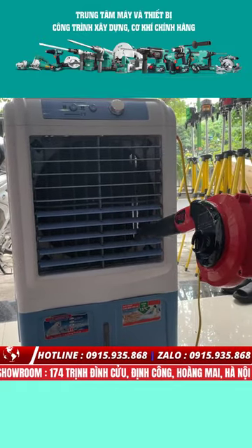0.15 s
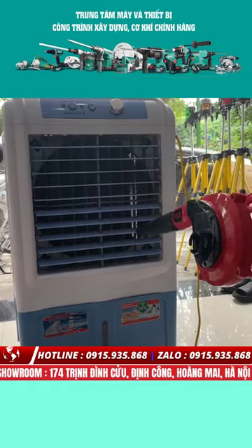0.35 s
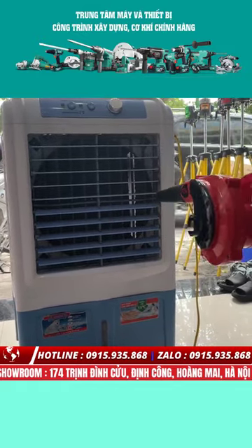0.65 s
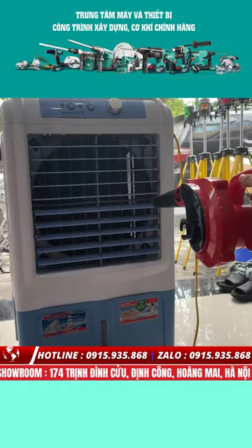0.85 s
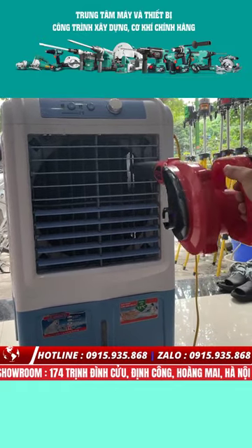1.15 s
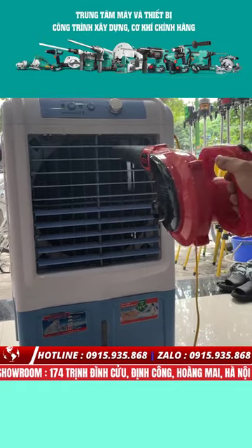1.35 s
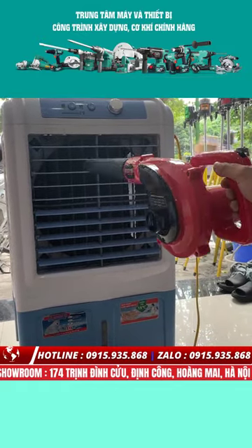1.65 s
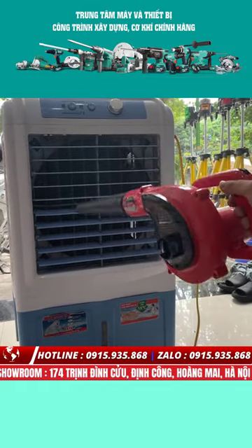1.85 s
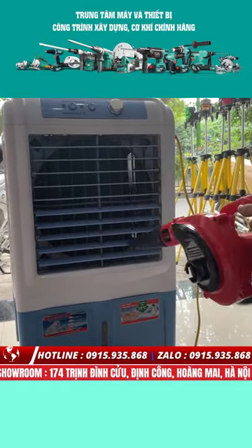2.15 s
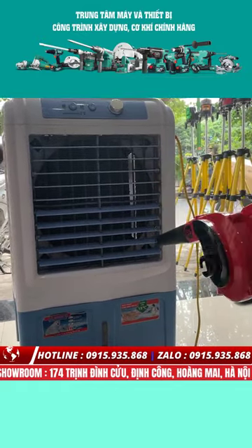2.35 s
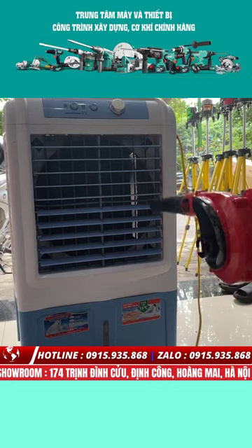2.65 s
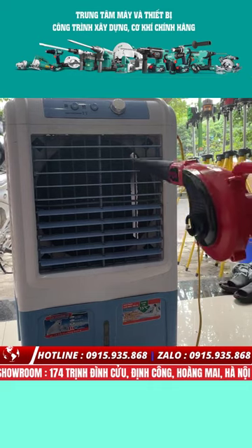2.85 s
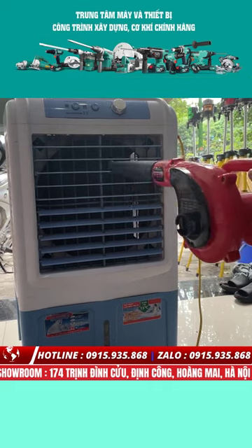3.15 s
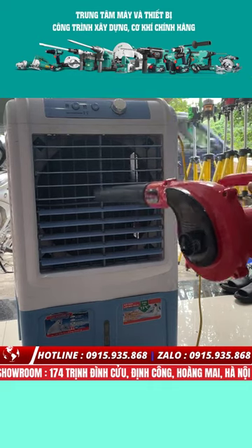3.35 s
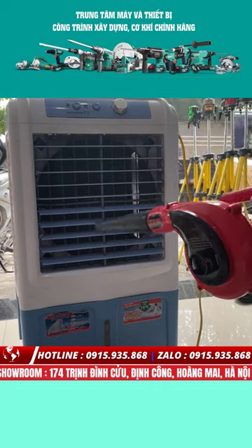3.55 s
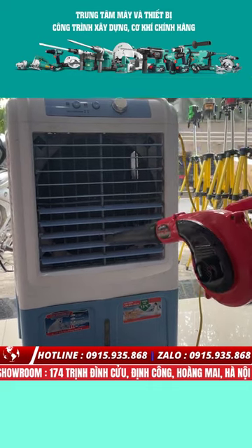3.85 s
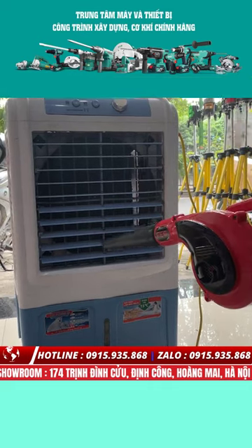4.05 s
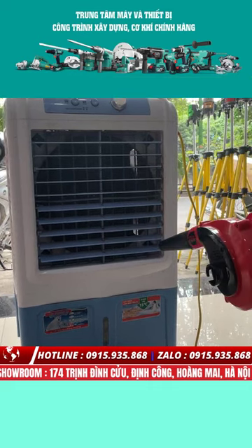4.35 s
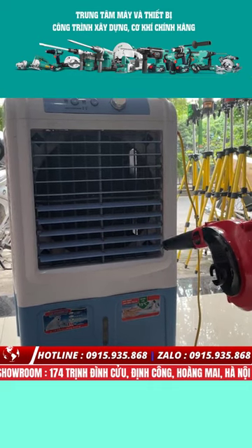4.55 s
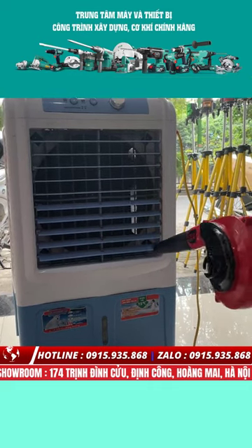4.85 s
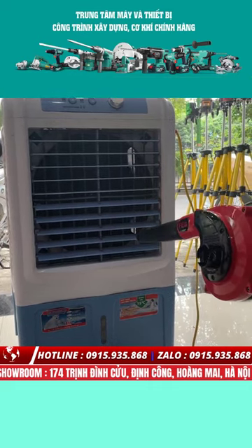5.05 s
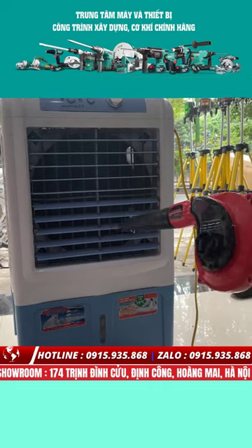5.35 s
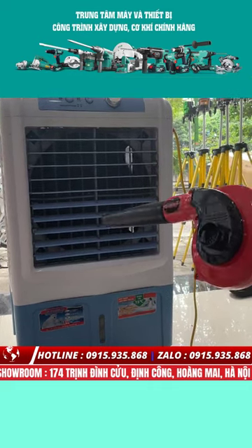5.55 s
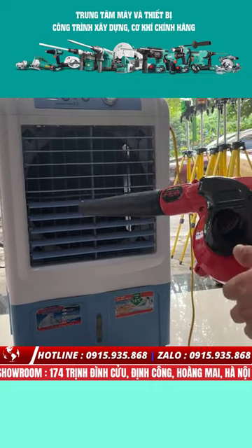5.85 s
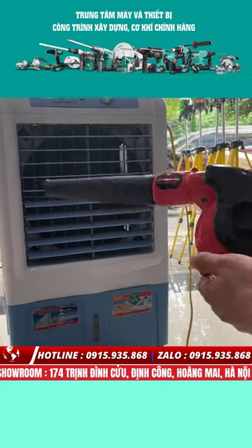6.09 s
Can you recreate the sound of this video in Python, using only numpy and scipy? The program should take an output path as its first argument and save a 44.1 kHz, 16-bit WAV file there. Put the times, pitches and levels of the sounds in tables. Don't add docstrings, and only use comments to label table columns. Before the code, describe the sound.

A handheld electric blower roars and whines at full speed over louvres, then switches off and coasts down in falling pitch.

```python
import sys
import numpy as np
from scipy import signal
from scipy.fft import rfft, irfft, next_fast_len
from scipy.io import wavfile

SR = 44100
rng = np.random.default_rng(int(sys.argv[2]) if len(sys.argv) > 2 else 0)


def unload_audio(sound):
    columns = np.transpose(np.atleast_2d(sound))
    steps = np.round(np.clip(columns, -1, 1) * 32767)
    wavfile.write(sys.argv[1], SR, steps.astype(np.int16))


def nominal_scale(level):
    x = np.asarray(level, float) / 20
    return 10 ** x


N = 274302
STEP = 32
BLADES = 10

# frequency in Hz, lead of the left port in radians.
PORT_LEAD = [(0, 0), (400, .1), (1290, .3), (2070, -.7), (2500, .5), (3270, .6), (4310, .2), (5250, .7),
             (6100, -.4), (7060, -1.6), (7800, -3.0), (8750, -3.3), (11000, -6.0), (12350, -6.55),
             (14100, -9.2), (15800, -9.6)]
# frequency in Hz, share of the jet's strike, share of nozzle nearness,
# power of shaft speed, street floor in dB.
AIR_LAYERS = [
    (90, .02, .02, 0.23, -30),
    (450, 0.045, 0.22, 2.4, -8.5),
    (1100, 0.92, .02, 2.4, -18),
    (1600, 1.5, .02, 3.3, -21),
    (2600, 0.27, 0.47, 3.3, -15.5),
    (4400, .02, 0.73, 4.5, -12.5),
    (10000, 0.024, 0.56, 5, -8.5),
]


def rms_one(x):
    return x / np.sqrt(np.mean(x ** 2) + 1e-20)


def in_time(rows):
    seconds, *columns = np.transpose(rows)
    return [np.interp(np.arange(N) / SR, seconds, column) for column in columns]


def at_hz(points, hz):
    f, value = np.transpose(points)
    return np.interp(np.log(hz + 1), np.log(f + 1), value)


def fine(slow):
    return np.interp(np.arange(N), np.arange(0, N, STEP), slow)


def swells(rows, ramp_s):
    t = np.arange(0, N, STEP) / SR
    gains = []
    for start, end, db, *_ in rows:
        ramp = np.minimum(t - start, end - t) / ramp_s + .5
        gains.append(nominal_scale(db) * np.clip(ramp, 0, 1) ** 2)
    return gains


def swelling(rows, ramp_s):
    return fine(sum(swells(rows, ramp_s)))


def drift(rate):
    r = np.exp(-80 * np.pi * rate / SR)
    slow = signal.lfilter([1], [1, -2 * r, r * r], rng.standard_normal(N // 40 + 2002))[2000:]
    return np.interp(np.arange(N) / 40, np.arange(len(slow)), rms_one(slow - slow.mean()))


def resonate(x, hz, width_hz):
    r = np.exp(-np.pi * width_hz / SR)
    gain = (1 - r * r) / 2
    return signal.lfilter([gain, 0, -gain], [1, -2 * r * np.cos(2 * np.pi * hz / SR), r * r], x)


def motorbike():
    # start in seconds, end in seconds, level in dB.
    carried = [
        [(.95, 1.6, -46)],
        [(.62, 1.55, -40), (1.75, 2.35, -41), (2.35, 2.75, -45), (2.9, 3.5, -47.5)],
        [(.35, 1.52, -41)],
    ]
    firing_hz, shift, pass_s, cross_s = 22.45, .068, 2.3, 0.502
    pull_hz, pull_s = .55, .45
    t = np.arange(N) / SR
    rate = firing_hz * (1 - shift * np.tanh((t - pass_s) / cross_s)) - pull_hz * np.exp(-t / pull_s)
    cycles = np.cumsum(rate) / SR
    out = 0
    for k, rows in enumerate(carried, 4):
        out = out + np.sqrt(2) * swelling(rows, ramp_s=0.17) * np.sin(2 * np.pi * k * cycles)
    return out


def engine():
    # start in seconds, end in seconds, level in dB.
    unmasked = [(0, .6, -44), (1.05, 1.4, -42), (1.55, 1.9, -39), (2.1, 2.8, -44), (2.75, 3.6, -40),
                (3.6, 4.5, -46), (5.42, 6.4, -39.5), (5.85, 6.4, -48)]
    # frequency in Hz, width in Hz.
    modes = [
        (62, 14),
        (105, 110),
    ]
    idle_hz, last_firing_s = 21.56, 6.171
    masked_db, upper_db = -54, -3.5
    cycles = np.arange(N) * idle_hz / SR
    fired = np.diff(np.floor(cycles - cycles[int(last_firing_s * SR)]), prepend=0) == 1
    soft = signal.butter(2, [32, 160], "band", fs=SR, output="sos")
    pulses = signal.sosfilt(soft, fired * nominal_scale(1.1 * drift(14.0)) + 1e-18)
    lower, upper = (rms_one(resonate(pulses, hz, width_hz)) for hz, width_hz in modes)
    gain = swelling(unmasked, ramp_s=0.26) + nominal_scale(masked_db)
    return gain * (lower + nominal_scale(upper_db) * upper) * 0.71


def port_noise():
    # frequency in Hz, left-right likeness from 0 to 1.
    likeness = [(60, .997), (200, .99), (340, .89), (860, .67), (1400, .58), (1900, .42), (2400, .6),
                (3300, .45), (4200, .67), (5200, .52), (6500, .68), (8200, .83), (10500, .62), (11200, .95),
                (12100, .95), (12800, .6), (14500, .93)]
    # frequency in Hz, left over right in dB.
    lean = [(60, 0), (110, 0), (200, 0), (380, -1.1), (700, 2.0), (1290, 1.2), (2380, 0.88), (4400, 2.7),
            (8120, 0.3), (15000, -0.1)]
    size = next_fast_len(N)
    hz = np.arange(size // 2 + 1) * SR / size
    shared, left, right = rfft(rng.standard_normal((3, size)))
    alike = np.clip(at_hz(likeness, hz), 0, 1)
    turn = np.exp(.5j * np.interp(hz, *np.transpose(PORT_LEAD))) * nominal_scale(at_hz(lean, hz) / 2)
    pair = [np.sqrt(alike) * shared + np.sqrt(1 - alike) * own for own in (left, right)]
    return hz, size, np.array([pair[0] * turn, pair[1] / turn])


def air_levels(coasting):
    # time in seconds, jet striking the louvres in dB, nozzle near the ports in dB.
    hand = [(0, 2.3, 3.2), (.3, -0.8, 1.7), (.75, 1.3, 5.4), (1.05, 1.5, 4.9), (1.35, -0.6, 2.7),
            (1.65, 0.5, 2), (1.8, -1, 2), (2.12, -0.7, 0.2), (2.3, 3.5, 4.2), (2.56, 4, 3),
            (2.7, -0.2, 3.9), (3.15, 1.1, 0.2), (3.3, -1, 0), (3.9, -1.5, -1.2), (4.2, -1, 1.5),
            (4.35, 0.5, 3.5), (4.72, 0.8, 2.1)]
    lag_s = 0.057
    strike, near = in_time(hand)
    left = 1 - np.interp(np.arange(N) - lag_s * SR, np.arange(N), coasting)
    levels_db = []
    for _, a, b, power, floor_db in AIR_LAYERS:
        driven = nominal_scale(a * strike + b * near) * left ** power
        levels_db.append(10 * np.log10(driven ** 2 + nominal_scale(floor_db) ** 2))
    return levels_db


def air(coasting, levels_db, patchy_db, gust_db):
    # frequency in Hz, level in dB per Hz.
    driven = [(25, -14), (40, -2.5), (100, -4.5), (200, -5.5), (400, -2), (700, -1.5), (1100, 3),
              (1900, -2.5), (2400, -2.5), (3500, -3.5), (5000, -7.5), (7000, -10.5), (11000, -18),
              (15600, -19.5)]
    # frequency in Hz, change in dB.
    recolouring = [(60, 2), (130, 1.5), (250, 0.5), (450, 0.5), (800, -3), (1200, -6), (2000, 1.5),
                   (3000, -4), (4400, 4), (6500, 1), (10000, 2), (15000, 0.5)]
    hz, size, noise = port_noise()
    noise = noise * nominal_scale(at_hz(driven, hz) - 16.5)
    lowest_hz, per_octave = 90, 2.25
    step = np.maximum(np.log2(np.maximum(hz, 1) / lowest_hz) * per_octave, 0)
    gusts, out = drift(10.0), 0
    moves = np.array([v - v[coasting == 0].mean() for v in levels_db])
    layer_log_hz = np.log(np.array(AIR_LAYERS)[:, 0])
    for k in range(18):
        centre = lowest_hz * 2 ** (k / per_octave)
        window = np.cos(np.pi / 2 * np.clip(step - k, -1, 1)) ** 2
        band = irfft(noise * window, size)[:, :N]
        share = [np.interp(np.log(centre), layer_log_hz, one) for one in np.eye(len(AIR_LAYERS))]
        calm = np.clip((1500 / centre) ** .5, .4, 1)
        recolour_db = np.clip(coasting / .4, 0, 1) * at_hz(recolouring, centre)
        chance_db = gust_db * gusts + patchy_db * calm * drift(6.8)
        out = out + band * nominal_scale(share @ moves + recolour_db + chance_db)
    return out


def reflected(x):
    # delay in seconds, level in dB, sway in seconds.
    paths = [(.0047, -7, .0004), (.0089, -7, .0005), (.0163, -8, .0006)]
    beamed = signal.butter(2, 1600, "high", fs=SR, output="sos")
    high, i = signal.sosfiltfilt(beamed, x), np.arange(N)
    out = high
    for delay_s, db, sway_s in paths:
        at = (i - (delay_s + sway_s * drift(0.794)) * SR) % (N - 1)
        out = out + nominal_scale(db) * np.array([np.interp(at, i, c) for c in high])
    power = 1 + 0.82 * sum(nominal_scale(db) ** 2 for _, db, _ in paths)
    return x - high + out / np.sqrt(power)


def whistles(coasting):
    # frequency in Hz, width in Hz, level in dB, index of its crossings.
    gaps = [(1040, 45, -5, 0), (1132, 90, -4, 1), (2385, 230, -4, 2), (3700, 130, -6, 3),
            (5705, 60, -22, 2)]
    # start in seconds, end in seconds, level in dB.
    crossings = [
        [(0, .15, -35), (1.0, 1.08, -39), (1.28, 1.34, -27), (2.28, 2.9, -33.5), (3.76, 3.85, -39),
         (4.4, 4.55, -41), (5.45, 5.55, -46), (5.98, 6.15, -50)],
        [(0, .15, -32), (.15, .5, -40), (.5, 1.33, -36.5), (1.83, 2.2, -40), (2.25, 3.0, -35.5),
         (3.75, 3.85, -39), (4.05, 4.15, -35), (4.4, 4.92, -40)],
        [(.03, .15, -43), (.62, 1.12, -30), (1.15, 1.4, -43), (2.25, 3.0, -38.5), (4.38, 4.87, -28.5)],
        [(0, .2, -32), (.45, 1.12, -34), (2.3, 2.75, -41), (2.85, 3.25, -33)],
    ]
    hz, size, noise = port_noise()
    white, out = irfft(noise, size)[:, :N], 0
    murmur_db = -46
    gains = [swelling(rows, ramp_s=0.061) + nominal_scale(murmur_db) for rows in crossings]
    for centre_hz, width_hz, db, column in gaps:
        once = resonate(white, centre_hz, width_hz)
        tone = rms_one(resonate(once, centre_hz, width_hz))
        dying_db = -70 * coasting * (centre_hz > 2000)
        out = out + tone * gains[column] * nominal_scale(db + dying_db + 1.5 * drift(9.0))
    return out


def shaft():
    full_speed_hz, switch_off_s, coast_s, drag_power = 261, 4.705, 2.1, 1.838
    off_s = np.maximum(np.arange(N) / SR - switch_off_s, 0)
    return full_speed_hz * (1 + off_s / coast_s) ** -drag_power


def blade(speed, coasting):
    # start in seconds, end in seconds, level in dB,
    # left over right in dB, lead of the left in radians.
    turnings = [(0, .26, -35.5, -4, -0.22), (.24, .58, -42.5, -2, -0.00055), (0.562, 0.87, -35.5, -2, 0.11),
                (0.87, 1.14, -37, 2, -0.45), (1.14, 1.487, -28, 0, 0.98), (1.45, 1.75, -33.5, -3, 0.54),
                (1.82, 1.957, -37, -1, .8), (2.173, 2.68, -35, 4, 0.85), (2.987, 3.365, -33, -3, .9),
                (3.52, 4.26, -36, 8.5, -2.1), (4.36, 4.686, -37.5, 6, -0.39)]
    # frequency in Hz, half width in Hz, level in dB,
    # left over right in dB.
    shop_peaks = [(2360, 71, -25.5, 0), (2135, 76, -30.5, 4), (1866, 98, -35.5, 7), (1705, 40, -40, -3),
                  (1536, 17, -44, -2), (1337, 47, -43, 12), (1238, 35, -41.5, 1), (1057, 98, -38, 4)]
    averted_db, averted_fade_db, averted_lead = -40, -30, 1.82
    sides = np.array([[.5], [-.5]])
    out = nominal_scale(averted_db + averted_fade_db * coasting) * np.exp(1j * sides * averted_lead)
    for gain, (*_, lean_db, lead) in zip(swells(turnings, 0.094), turnings):
        out = out + gain * nominal_scale(sides * lean_db) * np.exp(1j * sides * lead)
    for hz, width_hz, db, lean_db in shop_peaks:
        peak = np.exp(-((BLADES * speed - hz) / width_hz) ** 2)
        out = out + nominal_scale(db + sides * lean_db) * peak
    return np.array([fine(port) for port in out])


def whine(speed, coasting):
    # multiple of shaft speed, driven level in dB, level just after switch-off in dB,
    # level at the end in dB, left over right in dB, wander in dB.
    tones = [(1, -41.5, -56, -62, 0, 1.2), (2, -41.5, -54, -64, -4, 1.4), (9, -51, -58, -64, 0, 3),
             (11, -55, -56, -66, 0, 3), (12, -47, -60, -68, 0, 3), (20, -49, -55, -63, 0, 2.5),
             (24, -61, -80, -46, 0, 1.5), (30, -59, -55, -62, 0, 3), (35, -60, -61, -60, 0, 3),
             (36, -63, -62, -64, 0, 3), (48, -60.5, -53, -60, 0, 1.5), (60, -66, -64, -60, 0, 3),
             (72, -62, -60, -59, 0, 2), (96, -62, -62, -61, 0, 2), (120, -64, -64, -63, 0, 2),
             (144, -66, -66, -65, 0, 2)]
    # frequency in Hz, half width in Hz, boost in dB.
    ring_hz, ring_width_hz, ring_db = (11300, 1500, 5)
    wave_db, wave_hz = 3.5, 120
    turns = np.cumsum(speed + .15 * drift(8.0)) / SR
    ripple = rng.standard_normal((2, 400))
    flutter = nominal_scale(1.2 * drift(20.0))
    sides = np.array([[1], [-1]])
    height = blade(speed[::STEP], coasting[::STEP])
    spin = np.exp(2j * np.pi * (BLADES * turns + rng.random()))
    out = np.sqrt(2) * flutter * np.imag(height * spin)
    for k, driven_db, off_db, end_db, lean_db, wander_db in tones:
        hz = k * speed
        db = np.interp(coasting, [0, .05, coasting[-1]], [driven_db, off_db, end_db])
        place = (hz / wave_hz) ** .85
        left, right = (wave_db * np.interp(place, np.arange(400), r) * (coasting > 0) for r in ripple)
        db = db + ring_db * np.exp(-((hz - ring_hz) / ring_width_hz) ** 2)
        db = db + wander_db * drift(9.9) + (left + right) / 2
        port_db = db + sides * (lean_db + left - right) / 2
        lead = np.interp(hz, *np.transpose(PORT_LEAD)) / 2
        tone = nominal_scale(port_db) * np.sin(2 * np.pi * (k * turns + rng.random()) + sides * lead)
        heard = hz < 15700
        out = out + np.sqrt(2) * tone * heard
    return out


def scene():
    speed = shaft()
    coasting = 1 - speed / speed[0]
    street = motorbike() + engine()
    rush = air(coasting, air_levels(coasting), patchy_db=1.3, gust_db=.12)
    return street + reflected(rush) + whistles(coasting) + whine(speed, coasting)


def band_limit(x):
    return signal.sosfilt(signal.butter(12, 15730, fs=SR, output="sos"), x)


def record(dry):
    low_pass = signal.cheby2(12, 70, 16600, fs=SR, output="sos")
    mix = signal.sosfilt(low_pass, dry)
    return band_limit(mix)


dry = scene()
out = record(dry)
unload_audio(out)
```